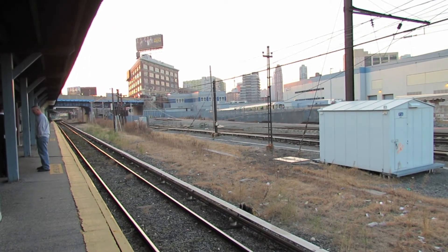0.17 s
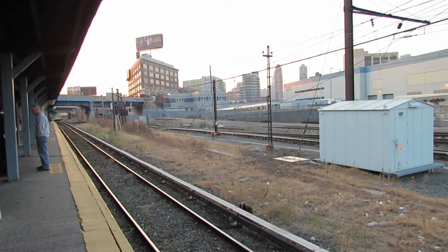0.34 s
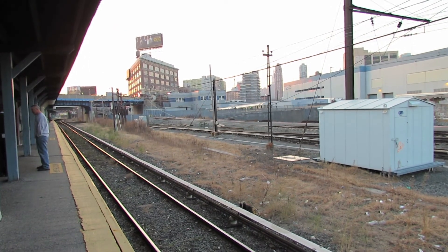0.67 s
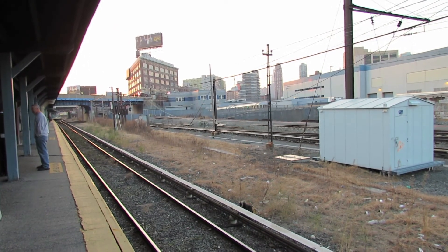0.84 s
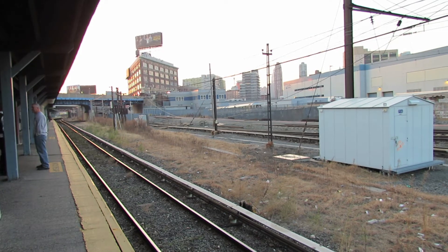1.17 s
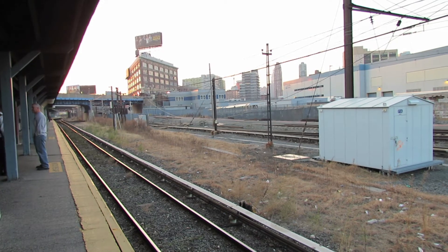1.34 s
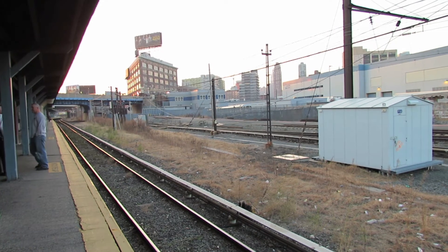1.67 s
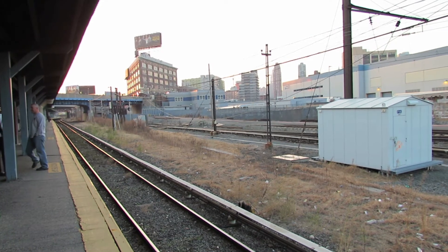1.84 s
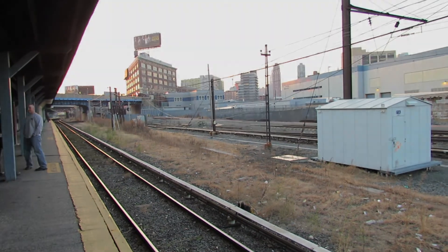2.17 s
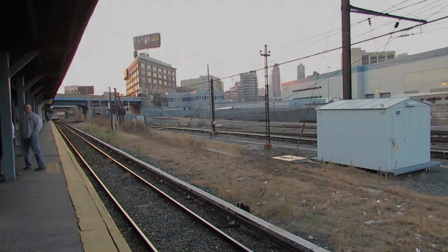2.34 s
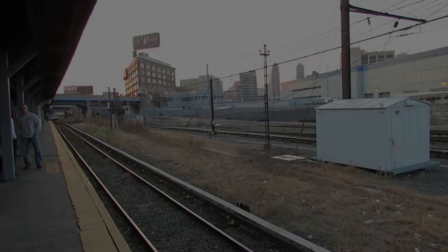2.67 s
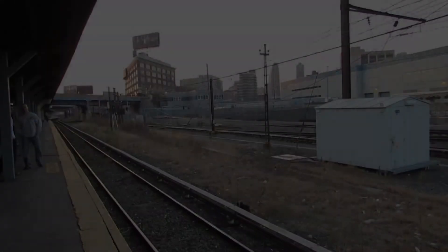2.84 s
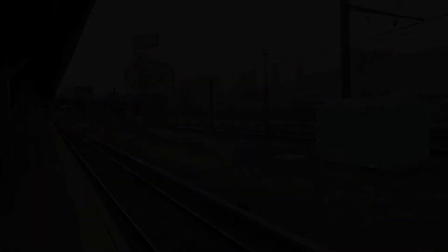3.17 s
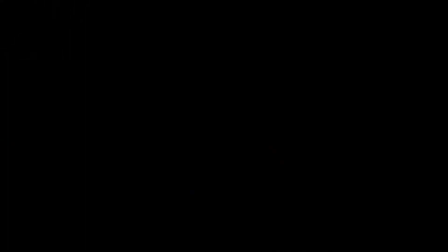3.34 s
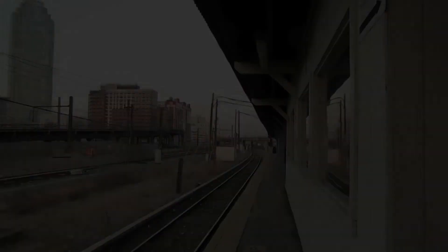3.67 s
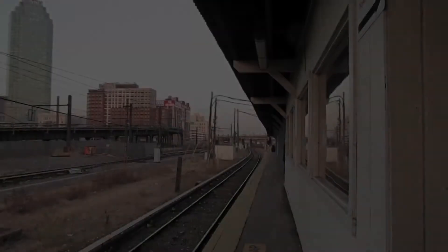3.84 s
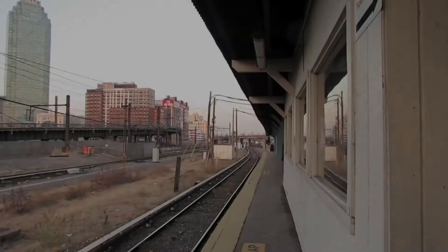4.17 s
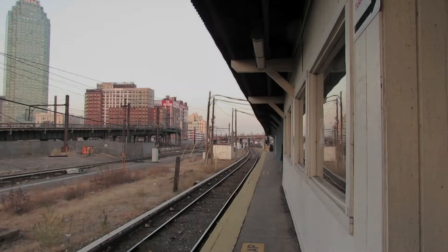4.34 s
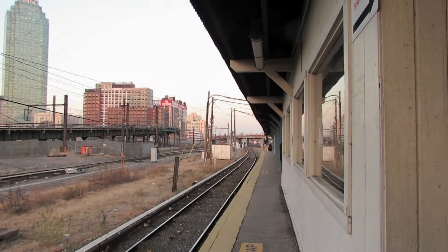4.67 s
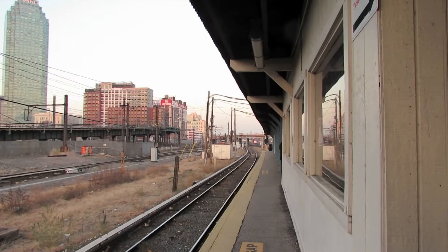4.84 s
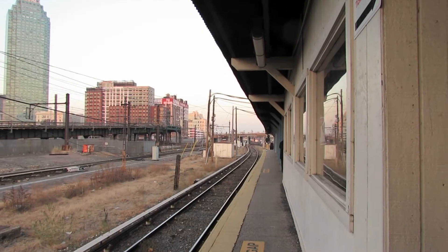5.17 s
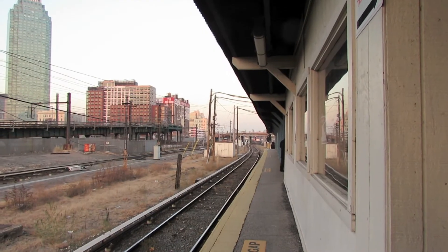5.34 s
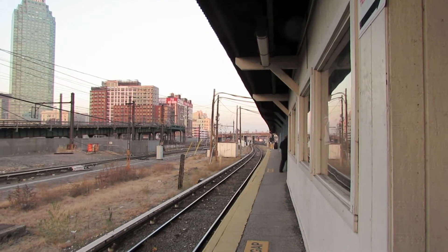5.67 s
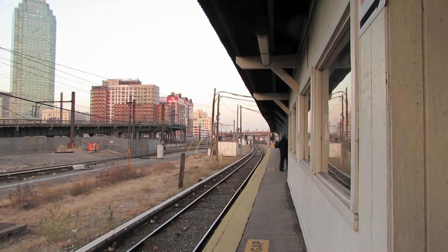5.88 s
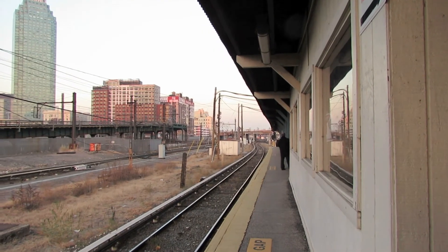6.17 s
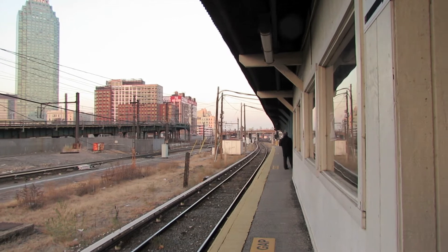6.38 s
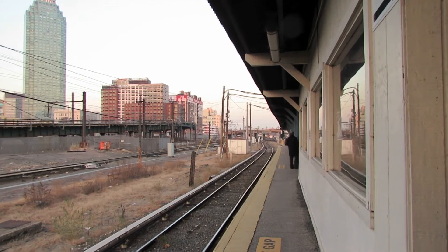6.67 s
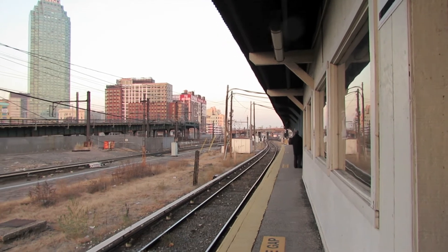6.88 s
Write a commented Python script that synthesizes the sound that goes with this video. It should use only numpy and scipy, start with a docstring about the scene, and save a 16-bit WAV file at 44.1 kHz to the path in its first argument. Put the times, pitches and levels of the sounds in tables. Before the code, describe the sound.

From an open station platform, a diesel idles with a steady low hum, broad roar and faint throbbing high whines. The sound fades out around three seconds, returns gradually, with a tiny chirp early on. Two harsh blasts of brake air follow, echoing off buildings and briefly ducking the background. Then rolling wheels grow louder, clanking over rail joints. The handheld stereo microphone leans slightly left.

```python
"""A strong exhaust drone fills an open rail yard: a diesel locomotive idles, with blower whines and a broad roar.
The drone sums sines at multiples of the firing cycle; whines are wavering sines, roar and hiss are coloured noise.
The sound fades to silence and returns in another balance. A chirp of sines leaps up, then two blasts of brake air,
noise with ringing nozzle tones, echo off buildings and push the gain control down. A train draws nearer as rolling
noise, its wheels clanking over rail joints as struck resonances; clicks and faint treble puffs are added."""
import sys
import numpy as np
from scipy import signal
from scipy.fft import rfft, irfft
from scipy.io import wavfile
from scipy.ndimage import uniform_filter1d

SR = 44100
rng = np.random.default_rng(int(sys.argv[2]) if len(sys.argv) > 2 else 0)


def master_out(mix):
    """Clip the mix to full scale and print it as 16-bit PCM to the path in sys.argv[1]."""
    frames = np.transpose(np.atleast_2d(mix))
    ceiling = np.clip(frames, -1, 1)
    pcm = np.round(ceiling * 32767).astype(np.int16)
    wavfile.write(sys.argv[1], SR, pcm)


N = 309141


def from_db(db):
    """Decibels to an amplitude factor."""
    return 10 ** (np.asarray(db) / 20)


def rms_one(x):
    """Scale to an rms of 1."""
    return x / np.sqrt(np.mean(x ** 2) + 1e-20)


def seconds():
    """The time of every sample in seconds."""
    return np.arange(N) / SR


def in_time(rows):
    """Straight lines in time through rows of (seconds, values..), one curve for each value."""
    s, *columns = np.transpose(rows)
    return [np.interp(seconds(), s, column) for column in columns]


def at_hz(points, hz, axis=1):
    """Read one column of a frequency table, interpolated along log frequency."""
    points = np.array(points)
    return np.interp(np.log(hz), np.log(points[:, 0]), points[:, axis])


def before_after(pair):
    """One value up to the silence, another after it."""
    return np.where(seconds() > 3.33, pair[1], pair[0])


def drift(rate_hz):
    """Slow chance: noise through a double one-pole low-pass, spread 1."""
    step = 40   # samples from one slow value to the next
    r = np.exp(-2 * np.pi * rate_hz * step / SR)
    noise = rng.standard_normal(N // step + 2002)
    slow = signal.lfilter([1], [1, -2 * r, r * r], noise)[2000:]   # the filter has settled
    return np.interp(np.arange(N) / step, np.arange(len(slow)), rms_one(slow))


def pan(left_over_right_db):
    """Left and right gains that split a level difference evenly."""
    return from_db([[left_over_right_db / 2], [-left_over_right_db / 2]])


def stereo_noise(spectrum):
    """Noise of a given colour with rms 1, its left-right likeness set at each frequency by mixing sum and difference."""
    # Each row: frequency in Hz, left-right likeness from -1 (opposite) to 1 (the same).
    likeness = [(60, 0.99), (130, 1), (290, 0.87), (640, 0.43), (1400, 0.42), (2400, 0.34), (3300, 0.88),
                (4200, .85), (4800, 1), (5500, -0.073), (6500, -1), (10000, -0.49), (12000, 0.37),
                (15000, .6)]
    mid, side = rfft(rng.standard_normal((2, N)))
    hz = np.maximum(np.arange(len(mid)) * SR / N, 1)
    alike = np.clip(at_hz(likeness, hz), -1, 1)
    pair = np.sqrt(1 + alike) * mid + np.sqrt(1 - alike) * side * [[1], [-1]]
    return rms_one(irfft(pair * from_db(at_hz(spectrum, hz)), N))


def envelope(start, rise, t60, hold=0):
    """Smooth rise to 1, a hold, then an exponential fall of 60 dB in t60; all in seconds."""
    t = seconds() - start
    attack = np.sin(np.pi / 2 * np.clip(t / max(rise, 1e-4), 0, 1)) ** 2
    return attack * from_db(-60 * np.maximum(t - rise - max(hold, 0), 0) / t60)


def resonate(x, hz, width_hz):
    """A two-pole resonance: it passes a band around hz and rings longer the narrower it is."""
    r = np.exp(-np.pi * width_hz / SR)
    feed = np.array([1, 0, -1]) * (1 - r * r) / 2
    return signal.lfilter(feed, [1, -2 * r * np.cos(2 * np.pi * hz / SR), r * r], x)


def filtered(x, order, hz, kind="low"):
    """Butterworth low-pass, high-pass or band-pass."""
    return signal.sosfilt(signal.butter(order, hz, kind, fs=SR, output="sos"), x)


def engine():
    """Exhaust and gear tones at multiples of the firing cycle, over a clatter that repeats each cycle and slowly changes."""
    # Each row: multiple of the cycle rate, level in dB before the silence, level in dB after it.
    drone = [(8, -37, -37.5), (9, -15, -14.5), (11.06, -44.5, -40.5), (14.2, -52, -50.5),
             (15.1, -45.5, -45), (15.98, -40, -39.5), (16.84, -49, -44), (20.96, -45, -44.5),
             (23.05, -50, -41), (25.07, -41.5, -46), (26.06, -43, -38.5), (28.65, -54, -49.5),
             (32.45, -38.5, -39.5), (36.4, -47, -43.5), (38.2, -42, -44), (42.04, -45.5, -42),
             (43, -43.5, -48), (44, -38.5, -46), (46, -47.5, -46), (48.3, -47, -50), (51.15, -50, -44.5),
             (57.4, -46, -50.5), (59.8, -53, -48), (60.2, -41, -47), (63.9, -47, -52), (65.8, -36, -37.5),
             (69.7, -49, -51), (77.6, -54.5, -50.5), (79, -51.5, -46.5), (83.9, -43.5, -44.5),
             (88, -51.5, -42), (89, -51.5, -50.5), (90.3, -48, -50), (92.7, -50.5, -53),
             (94.4, -54.5, -46.5), (98.4, -47.5, -46.5), (99, -54, -47), (102, -46, -50.5),
             (105.2, -47.5, -44.5), (111, -52, -48), (132, -47.5, -54)]
    # Colour of the clatter. Each row: frequency in Hz, relative density in dB.
    clatter_colour = [(70, -12.5), (200, 1.5), (500, -3), (1000, -7.5), (1600, -20.5)]
    cycle_hz, clatter_db = 7.236, -39
    cycles = cycle_hz * seconds() + 0.0013 * drift(1.0)
    wavers_db = [2.2 * drift(3.0) for _ in range(8)]   # shared out among the tones
    tones = 0
    for k, (order, *levels_db) in enumerate(drone):
        waver_db = .4 * drift(1.5) if order == 9 else wavers_db[k % 8]   # the main drone hardly wavers
        gain = np.sqrt(2) * from_db(before_after(levels_db) + waver_db)
        tones = tones + gain * np.sin(2 * np.pi * order * cycles + rng.uniform(0, 2 * np.pi))
    colour = from_db(at_hz(clatter_colour, np.arange(1, 257) * cycle_hz))
    patterns = irfft(colour * rfft(rng.standard_normal((3, 510))), 2048)   # three one-cycle waves
    place = np.arange(2048) / 2048
    clatter = sum(drift(.8) * np.interp(cycles % 1, place, pattern, period=1) for pattern in patterns)
    return (tones + from_db(clatter_db) * rms_one(clatter)) * pan(1.3)


def whines(gain_db):
    """Steady fan and blower tones that waver; those over 4 kHz throb with the blower shaft and go flat at each dip."""
    # Each row: frequency in Hz, level in dB before the silence, level in dB after it,
    # spread of the waver in dB, left over right in dB.
    tones = [(59.6, -35.5, -44, 2, 1), (192.7, -39.5, -44, 2, 1), (3346, -60, -46.5, .7, 0),
             (3391, -52.5, -57, 2, 0), (3472, -56, -64, 1.5, 0), (3650, -53, -58, 3, 0),
             (3729, -46.5, -51.5, 2.5, 0), (3772, -51.5, -63, 1, 0), (3859, -52.5, -46.5, 1, 0),
             (4104.6, -43, -52, 1.5, 0), (4412, -57.5, -66, 1, 0), (4590, -62, -60, 2, 0)]
    # Each row: time in seconds, swing of the throb as a share of the tone.
    throb_depth = [(0, .3), (1.2, .4), (2.1, .85), (2.6, .6), (7.01, .6)]
    # Each row: frequency in Hz of the whine that swells, start in seconds, rise in seconds,
    # hold in seconds, 60 dB fall time in seconds, swell in dB.
    swells = [(3472, 2.1, .08, .5, .5, 7), (3729, 2.5, .1, .5, .5, 3), (3729, 5.93, .06, .3, .5, 5)]
    throb_hz, first_dip_s = 6.07, .07
    t, depth = seconds(), np.clip(in_time(throb_depth)[0], 0, 1)
    out = 0
    for hz, before_db, after_db, waver_db, pan_db in tones:
        shaft = 2 * np.pi * throb_hz * (t - first_dip_s) + .14 * drift(1.5)
        flutter = .55 * (hz in (3650, 3729)) * drift(9)   # radians; two whines blur in pitch
        flattening = (hz > 4000) * (1.8 * np.sin(shaft) + .3 * np.sin(2 * shaft))   # radians
        phase = 2 * np.pi * hz * t + .5 * drift(1.3) + flutter - flattening
        tone = np.sin(phase + rng.uniform(0, 2 * np.pi))
        throb = 1 - depth * (hz > 4000) * np.cos(shaft)   # one dip each turn
        level_db = before_after((before_db, after_db)) + waver_db * drift(15)
        # the two compressor whines drop away during the first blast of air
        level_db = level_db - 20 * (hz in (3346, 3859)) * (t > 5.06)
        for swell_hz, start, rise, hold, t60, swell_db in swells:
            if hz == swell_hz:
                level_db = level_db + swell_db * envelope(start, rise, t60, hold)
        out = out + np.sqrt(2) * from_db(level_db) * throb * tone * pan(pan_db)
    return out * from_db(gain_db)


def roar(level_db):
    """Engines, fans and far traffic as noise in three bands that swell partly together, partly alone."""
    # Each row: frequency in Hz, relative density in dB.
    colour = [(30, -10.5), (70, -10), (110, -3), (200, 1.5), (400, -3), (800, -5), (1500, -9.5),
              (2200, -12.5), (3000, -15), (4000, -18), (5000, -25.5), (6000, -33), (8000, -46),
              (10500, -49), (15500, -60)]
    noise, together_db = stereo_noise(colour), .35 * drift(3)
    low, under = filtered(noise, 2, 500), filtered(noise, 2, 2500)
    bands = (low, under - low, noise - under)
    swelling = sum(band * from_db(together_db + 0.86 * drift(8.9)) for band in bands)
    return from_db(level_db) * swelling * pan(0.6)


def hiss(level_db):
    """Treble noise whose level drifts slowly."""
    # Each row: frequency in Hz, relative density in dB.
    colour = [(4000, -14.5), (6000, 5.5), (7200, -4), (8500, -9), (10500, -9.5), (13000, -17), (15500, -23)]
    return from_db(level_db + 1.5 * drift(5)) * stereo_noise(colour)


def narrow_hiss(level_db):
    """A faint narrow band of hiss near 6.9 kHz: noise twice through one narrow resonance."""
    hz, width_hz = 6870, 590
    once = resonate(stereo_noise([(300, 0.00043), (15000, 0.0033)]), hz, width_hz)
    return from_db(level_db + 1.5 * drift(2)) * rms_one(resonate(once, hz, width_hz))


def rolling(level_db):
    """Wheels on rails: an uneven rumble, the right channel delayed so that it leans left."""
    # Each row: frequency in Hz, relative density in dB.
    colour = [(150, -11.5), (350, 6.5), (700, 7), (1300, -3.5), (2200, -4.5), (3500, -19), (4800, -8.5),
              (6000, -29), (12000, -45)]
    left, right = from_db(level_db + 0.36 * drift(11)) * stereo_noise(colour)
    return np.array([left, np.roll(right, 10)])   # delay in samples


def clicks():
    """Sharp clicks close by: a single impulse, band-passed, plus the short ring of a resonance."""
    # Each row: time in seconds, impulse level in dB, lowest frequency in Hz, ringing frequency in Hz,
    # ringing level in dB.
    rows = [(.828, -33, 5000, 7000, 5.5), (1.325, -26, 7030, 9760, 11), (3.644, -7.5, 900, 4480, 21.5),
            (3.654, -14, 1200, 5900, 15.5), (5.450, 0, 5500, 6300, 10)]
    out = 0
    for start, level_db, low_hz, ring_hz, ring_db in rows:
        click = np.full((2, N), 1e-18)
        click[:, round(start * SR)] = from_db(level_db) * np.array([1, .2])   # nearer the left port
        snap = filtered(click, 2, [low_hz, 13000], "band")
        out = out + snap + from_db(ring_db) * resonate(click, ring_hz, 700)
    return out


def treble_puffs():
    """Faint short puffs of treble noise: each a quick swell of noise through a high-pass."""
    # Each row: start in seconds, level in dB, 60 dB fall time in seconds, lowest frequency in Hz.
    rows = [(1.05, -49, 0.74, 9400), (1.34, -45, 0.23, 8000), (1.80, -51.5, 0.14, 9100),
            (1.89, -53.5, 0.055, 9060), (2.035, -48, 0.14, 6960), (5.455, -34, 0.23, 11560),
            (5.795, -36, 0.1, 12000)]
    noise, out = stereo_noise([(3000, -4.0), (8000, 17), (15000, -1.5)]), 0
    for start, level_db, t60, low_hz in rows:
        puff = from_db(level_db) * envelope(start, t60 / 20, t60) * noise
        out = out + filtered(puff + 1e-18, 4, low_hz, "high")
    return out


def chirp():
    """Two faint chirps, perhaps a small bird: hoarse sines that leap up in pitch and level off."""
    # Each row: start in seconds, length in seconds, first frequency in Hz, last frequency in Hz, level in dB.
    rows = [(3.894, .038, 2600, 4150, -34.5), (3.93, .016, 3200, 4350, -33.5)]
    out, hoarse_db, wobble = 0, 2.0 * drift(120), .5 * drift(150)   # wobble in radians
    for start, length, from_hz, to_hz, level_db in rows:
        share = np.clip((seconds() - start) / length, 0, 1)
        hz = to_hz + (from_hz - to_hz) * (1 - share) ** 3
        phase = 2 * np.pi * np.cumsum(hz) / SR
        out = out + from_db(level_db + hoarse_db) * np.sin(np.pi * share) ** .4 * np.sin(phase + wobble)
    return out * pan(0)


def brake_air():
    """The valve opens, the noisy jet builds up, sings on two nozzle tones and dies; each wall returns a dull echo."""
    # Colours of the jet and of its treble. Each row: frequency in Hz, relative density in dB.
    body_colour = [(400, 3), (1000, 5), (1600, 4.5), (2300, 8), (3200, 9), (4000, 5.5), (5000, 3),
                   (6200, 5), (8000, -81)]
    top_colour = [(3000, -38.5), (5000, -19.5), (6500, 0.5), (7600, -5), (9000, -6.5), (10500, -7),
                  (12500, -11.5), (14000, -13), (15700, -13.5)]
    # Each row: start in seconds, level in dB, build-up in seconds, build-up in dB, 60 dB fall time in seconds,
    # thinness from 0 to 1, treble in dB, very top over treble in dB, upper nozzle tone in dB,
    # lower nozzle tone in dB, echo in dB.
    blasts = [(5.035, -14.5, 0.047, 2.5, 0.5, 0.05, 0, 4.5, -1, -3, -19),
              (5.532, -11.5, 0.026, 5, 0.45, 0.5, -7, -4.5, -8, 2.5, -13.5)]
    # Each row: delay in seconds after start and build-up, gain in dB, rise in seconds,
    # 60 dB fall time in seconds, strongest frequency in Hz.
    walls = [(0.146, -1, 0.016, 0.4, 3110), (.277, -2, .011, 0.3, 3600)]
    valve_s = 0.037   # time the valve takes to open
    t, out = seconds(), 0
    smooth = stereo_noise(body_colour)
    body = smooth * from_db(1.0 * drift(50))   # the jet sputters
    top = stereo_noise(top_colour) * from_db(0.96 * drift(35))
    very_top = filtered(top, 2, 10500, "high")
    low = signal.sosfiltfilt(signal.butter(2, 2800, fs=SR, output="sos"), body)
    edge = 2.1 * resonate(body, 5100, 660)   # a bright edge on the thinner jet
    cough = rms_one(resonate(smooth, 1500, 1300)) * pan(-4)

    def nozzle(hz):
        """Jet noise twice through one resonance."""
        return rms_one(resonate(resonate(body, hz, 1100), hz, 1100)) / 2

    upper, lower = nozzle(4760), nozzle(4100) * pan(4)
    echoes = []
    for *_, hz in walls:
        coloured = smooth + from_db(7) * resonate(smooth, hz, 1100)
        echoes.append(coloured * pan(0.5) + from_db(-28) * top)

    for (start, level_db, build, build_db, t60, thin, treble_db, top_db, upper_db, lower_db,
         echo_db) in blasts:
        growing = from_db(-build_db * np.clip(1 - (t - start - valve_s) / build, 0, 1))
        thinned = body + np.clip(thin, 0, 1) * (edge - low)
        jet = growing * envelope(start, valve_s, t60, build) * thinned
        jet = jet + from_db(upper_db) * growing * envelope(start, valve_s, 0.41, build) * upper
        swell_s = .03   # the lower tone peaks at full flow
        lower_shape = envelope(start + valve_s + build - swell_s, swell_s, 0.18)
        jet = jet + from_db(lower_db) * lower_shape * lower
        # a dull cough as the valve opens fully
        jet = jet + from_db(-11) * envelope(start + valve_s / 2, valve_s / 2, 0.18) * cough
        spray = envelope(start, valve_s, 0.35, build) * (top - very_top)
        very_top_shape = np.sqrt(growing) * envelope(start, valve_s, .25, .03)
        spray = spray + from_db(top_db) * very_top_shape * very_top
        back = 0
        for (delay, gain_db, rise, fall, _), echo in zip(walls, echoes):
            back = back + from_db(gain_db) * envelope(start + build + delay, rise, fall) * echo
        blast = jet * pan(-2) + from_db(treble_db) * spray + from_db(echo_db) * back
        out = out + from_db(level_db) * blast
    return out


def clanks():
    """Wheels over rail joints: each blow rings the wheel modes in its own balance, with a bright crack that bounces."""
    # Each row: start in seconds, level in dB, decay scale in seconds (each part takes a share), crack in dB.
    blows = [(6.05, -34, 0.23, -9), (6.119, -40.5, .2, -11), (6.262, -31.5, 0.19, -15),
             (6.408, -20.5, 0.35, -10.5), (6.631, -20.5, 0.37, -11.5), (6.745, -35, 0.24, 3.5),
             (6.835, -34.5, .3, -12)]
    # Each row: mode frequency in Hz, width in Hz (scaled for each use), level in dB.
    wheel_modes = [(380, 200, -6), (730, 330, -2), (935, 240, 2), (1200, 480, 1), (1530, 460, -3.5),
                   (1940, 600, -8.5), (2480, 900, -7), (3230, 900, -11.5), (4280, 1100, -9.5)]
    bounce_s, bounce_db = 0.024, -5   # the wheel strikes again just past the joint
    strike_s, strike_db = .007, 16.5   # the firm contact at the height of each blow
    noise = stereo_noise([(300, 14.5), (5000, -2.0), (6000, -22.0), (15000, -11.0)])
    modes = []
    for hz, width, mode_db in wheel_modes:
        smeared = resonate(resonate(noise, hz, width), hz, 4.9 * width)
        modes.append(rms_one(smeared) * from_db(mode_db))
    crack = rms_one(filtered(noise, 3, [1500, 4900], "band"))
    strengths = from_db(rng.normal(0, 0.3, (len(blows), len(modes))))
    out = 0
    for (start, level_db, decay, crack_db), strength in zip(blows, strengths):
        ring = sum(gain * mode for gain, mode in zip(strength, modes))
        snap = envelope(start, 0.0056, 0.17 * decay)
        snap = snap + from_db(bounce_db) * envelope(start + bounce_s, .007, .3 * decay)
        blow = envelope(start, 0.0084, 0.84 * decay, 0.0087) * ring + from_db(crack_db) * snap * crack
        out = out + from_db(level_db) * blow
        strike = np.full(N, 1e-18)
        strike[round((start + strike_s) * SR)] = from_db(level_db + strike_db)
        for gain, (hz, width, mode_db) in zip(strength, wheel_modes):
            out = out + gain * from_db(mode_db) * resonate(strike, hz, width / 2)
    return out


def scene():
    """All layers; as the train comes near it adds hiss and screens off the whines."""
    # Level of the rolling train. Each row: time in seconds, level in dB.
    train = [(0, -32), (1, -43), (3.3, -47.5), (3.35, -31.5), (5.9, -29.5), (6.3, -27), (7.01, -22.5)]
    train_db, = in_time(train)
    nearer_db = np.maximum(train_db - train_db[round(5.9 * SR)], 0)   # gain over its level at 5.9 s
    tones = engine() + whines(-0.36 * nearer_db)
    # pairs: dB before the silence, dB after it
    steady = roar(before_after((-22.5, -24.5))) + narrow_hiss(before_after((-52, -51.5)))
    steady = steady + hiss(before_after((-70.5, -49)) + 0.6 * nearer_db)
    details = clicks() + treble_puffs() + chirp()
    return tones + steady + rolling(train_db) + details + brake_air() + clanks()


def gain_control(x):
    """Bright sound over the knee pulls the gain down; half of the cut follows fast, half slowly."""
    knee_db, slope = -24, 0.92   # slope: dB of cut per dB over the knee
    attack, release, slow_attack, slow_release = 0.0072, 0.2, 0.21, 0.81   # time constants in seconds
    slow_share = 0.5
    step = 64   # samples from one gain value to the next
    bright = filtered(x, 2, 1500, "high")
    power = uniform_filter1d(np.mean(bright ** 2, axis=0), size=441)[::step]
    level_db = 10 * np.log10(power + 1e-12)
    fast = slow = 0
    cut_db = []
    for over in slope * np.maximum(level_db - knee_db, 0):
        fast += (over - fast) * step / SR / (attack if over > fast else release)
        slow += (over - slow) * step / SR / (slow_attack if over > slow else slow_release)
        cut_db.append((1 - slow_share) * fast + slow_share * slow)
    return x * from_db(-np.interp(np.arange(N) / step, np.arange(len(cut_db)), cut_db))


def fade():
    """Down along a gentle curve, cut to silence, then up again to a level that slowly sags."""
    t = seconds()
    start, zero, cut, cut_length = 1.93, 3.384, 3.236, 0.0078   # s; the cut comes before the curve's zero
    back, full = 3.402, 5.013   # s
    down = np.clip((zero - t) / (zero - start), 0, 1) ** 1.24
    down = down * np.clip((cut + cut_length / 2 - t) / cut_length, 0, 1)
    sagging = from_db(0.92 - 0.51 * np.maximum(t - full, 0))   # dB, and dB per second
    return down + np.clip((t - back) / (full - back), 0, 1) ** 1.12 * sagging


def record(dry):
    """Port colour and lag, a treble band in opposite phase left and right, gain control, fade, steep top cut."""
    # The two microphone ports. Each row: frequency in Hz, left over right in dB, lag of the left in radians.
    ports = [(50, -0.5, 0.1), (320, 1, 0.12), (1040, -1.5, 0.38), (2420, -0.5, 0.088), (2930, 3.5, 0.81),
             (4280, 8.5, 0.98), (4340, 6, 0.041), (4630, 5.5, 0.99), (5500, 3, 0.86), (6300, 0.5, 0.51),
             (16000, 0.5, 0.2)]
    # Level of the sum and the difference of the two channels at each frequency.
    # Each row: frequency in Hz, sum in dB, difference in dB.
    matrix = [(5000, 0, 0.5), (5680, -0.5, 2), (6020, -3, 1), (6265, -9.5, 1.5), (7200, -46.5, 2.5),
              (7700, -50, 5.5), (8500, -44.5, 6), (9380, -15.5, 2.5), (9840, 0.5, -0.5), (10630, -0.5, 0.5),
              (11800, 0.5, -3.5), (12500, 2, -11.5), (16000, -2, -18)]
    left, right = rfft(dry)
    hz = np.maximum(np.arange(len(left)) * SR / N, 1)
    left = left * from_db(at_hz(ports, hz)) * np.exp(-1j * at_hz(ports, hz, axis=2))
    mid = (left + right) / 2 * from_db(at_hz(matrix, hz))
    side = (left - right) / 2 * from_db(at_hz(matrix, hz, axis=2))
    faded = gain_control(irfft([mid + side, mid - side], N)) * fade()
    top_cut = signal.cheby2(14, 45, 15853, fs=SR, output="sos")   # 45 dB down from 15853 Hz up
    return signal.sosfilt(top_cut, faded)


dry = scene()
out = record(dry)
master_out(out)
```